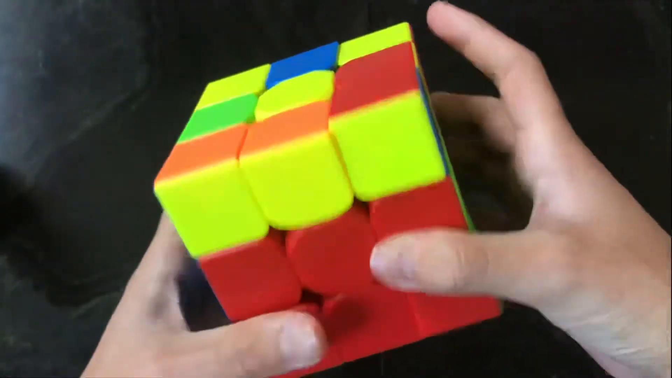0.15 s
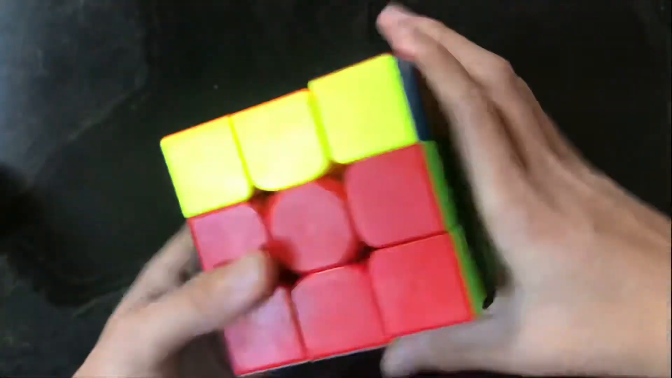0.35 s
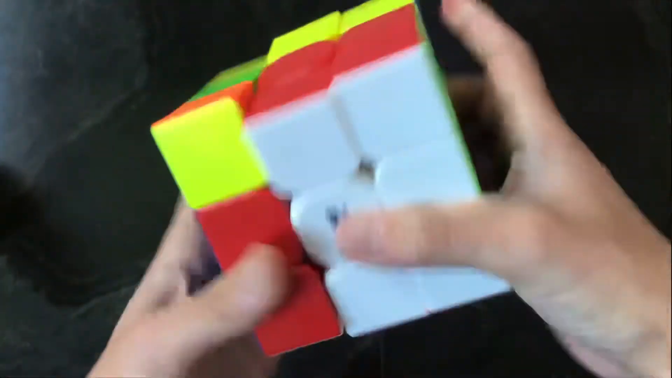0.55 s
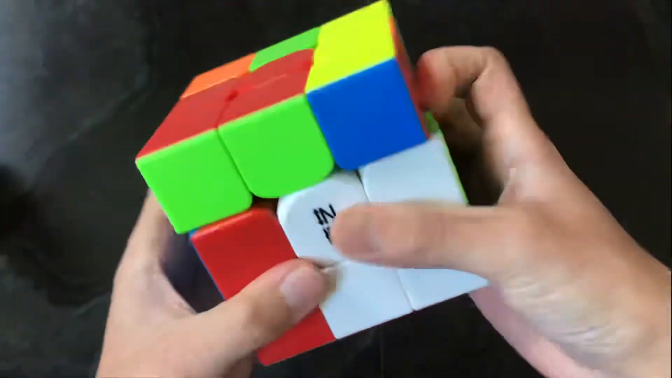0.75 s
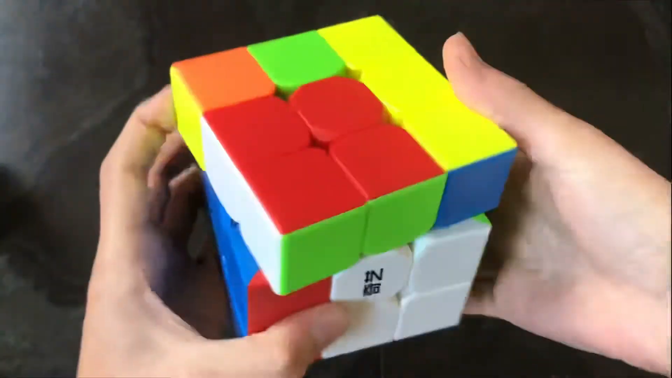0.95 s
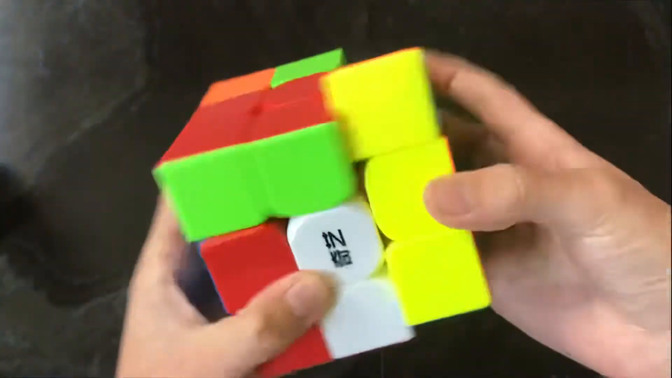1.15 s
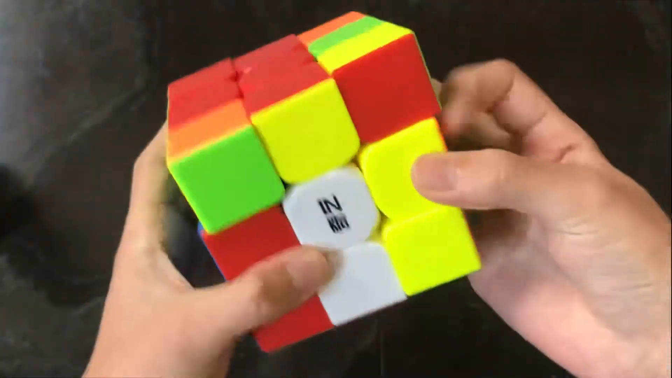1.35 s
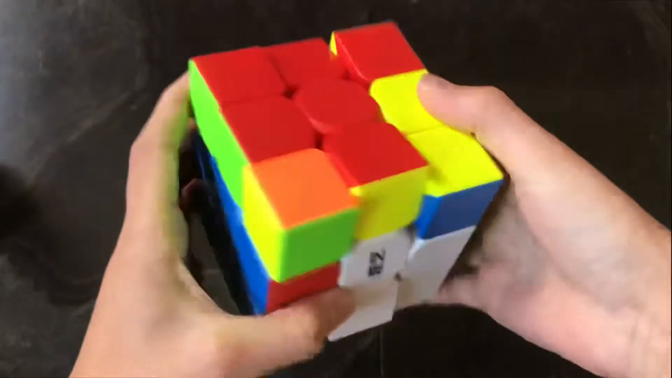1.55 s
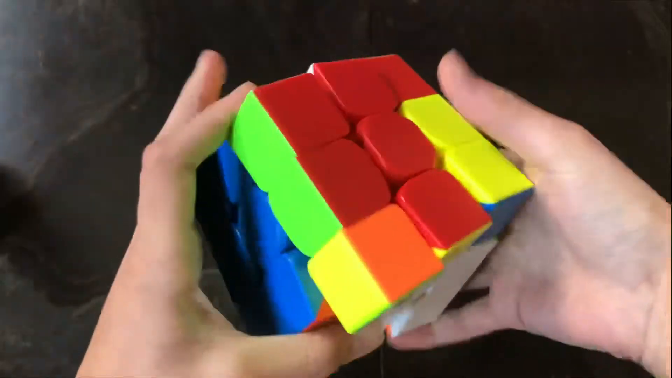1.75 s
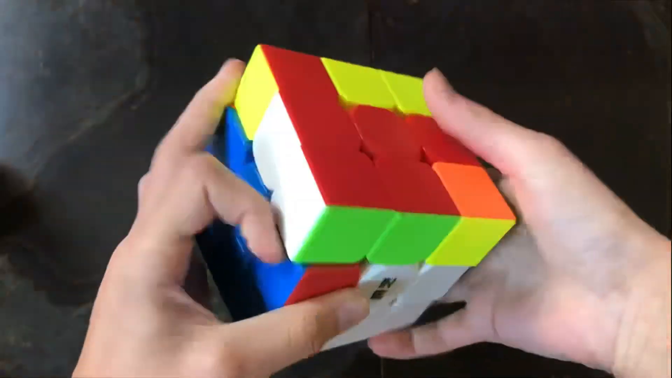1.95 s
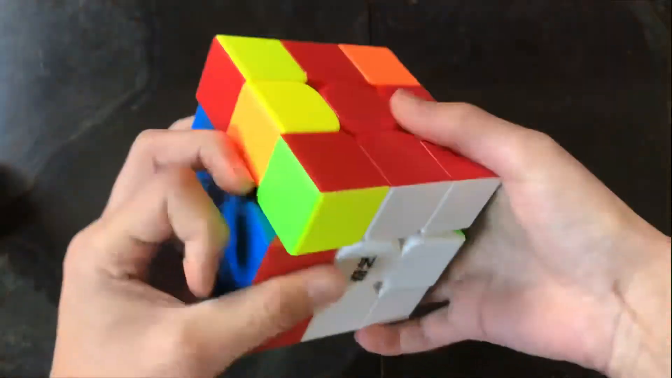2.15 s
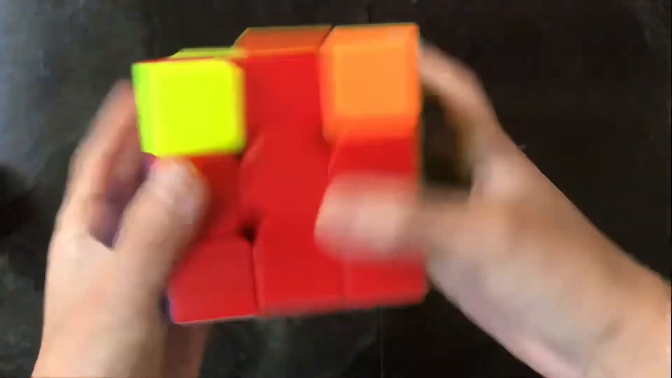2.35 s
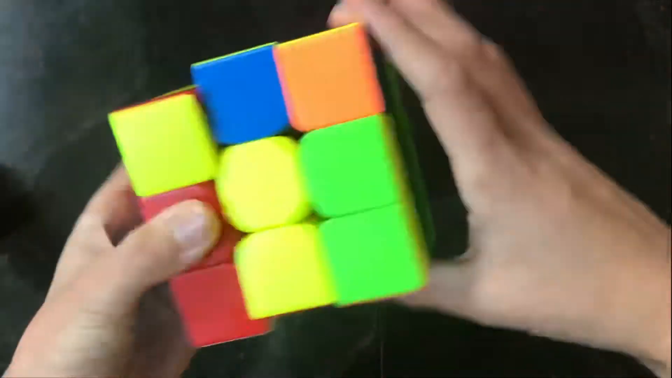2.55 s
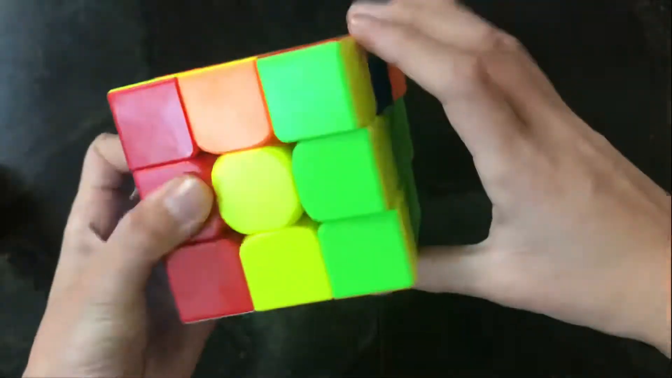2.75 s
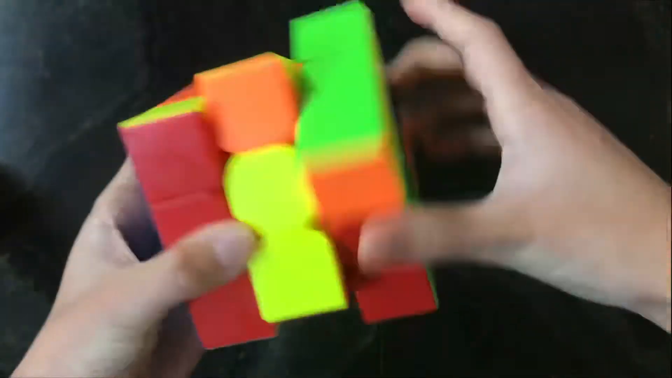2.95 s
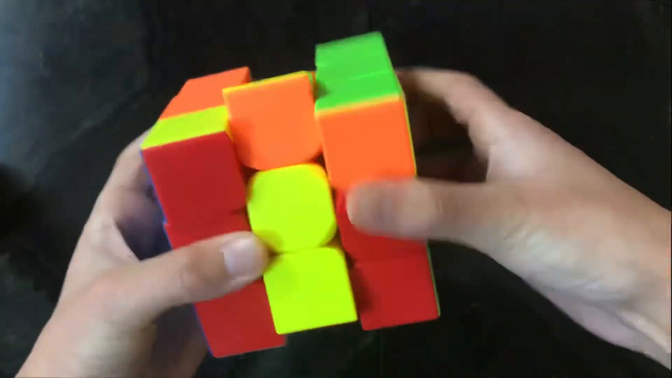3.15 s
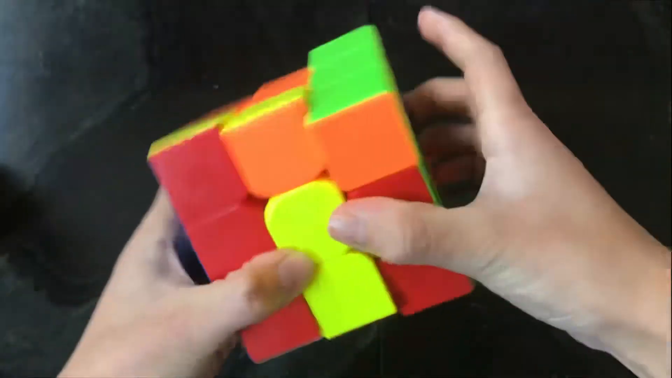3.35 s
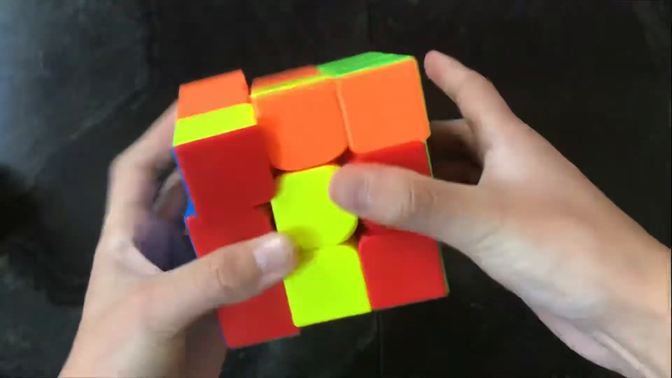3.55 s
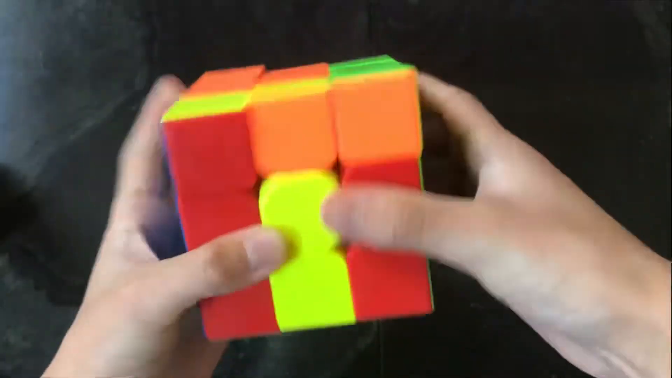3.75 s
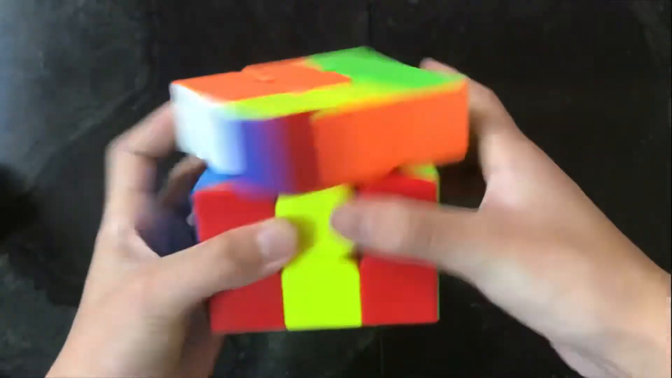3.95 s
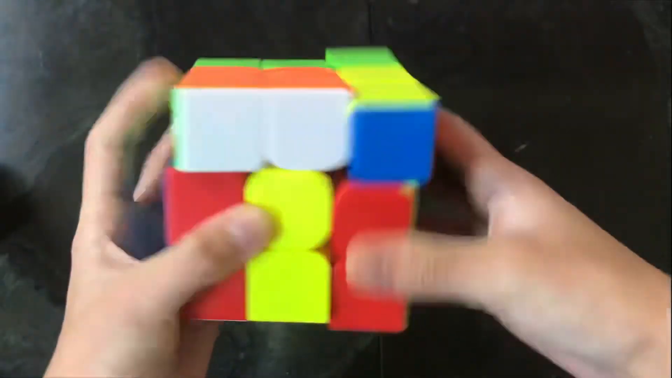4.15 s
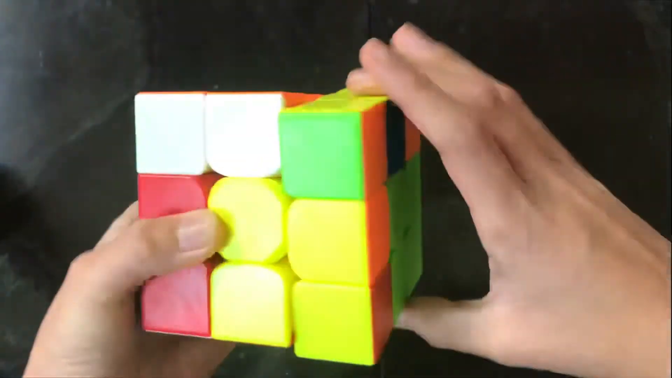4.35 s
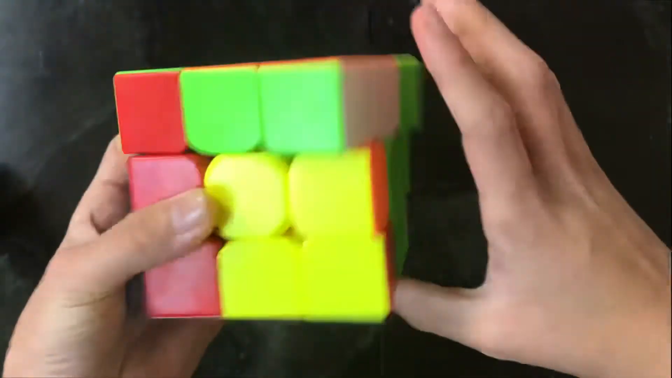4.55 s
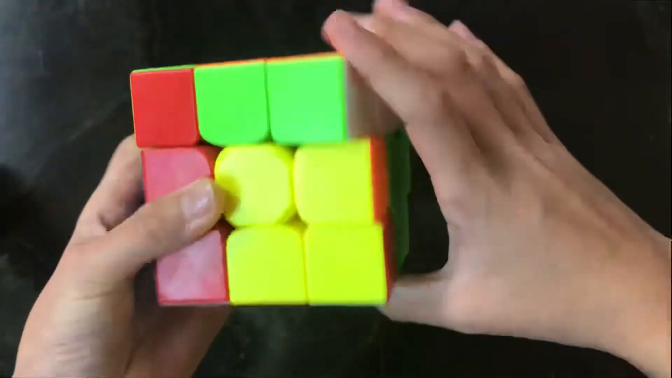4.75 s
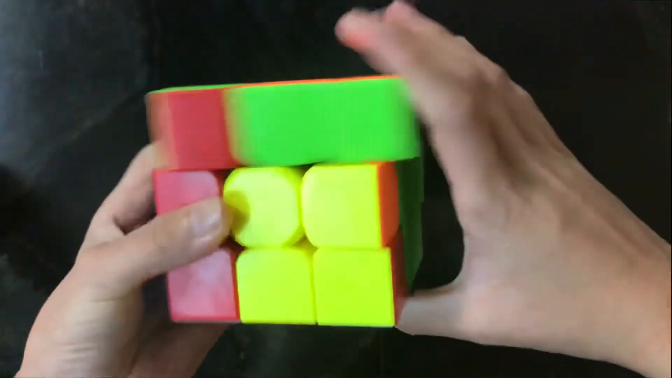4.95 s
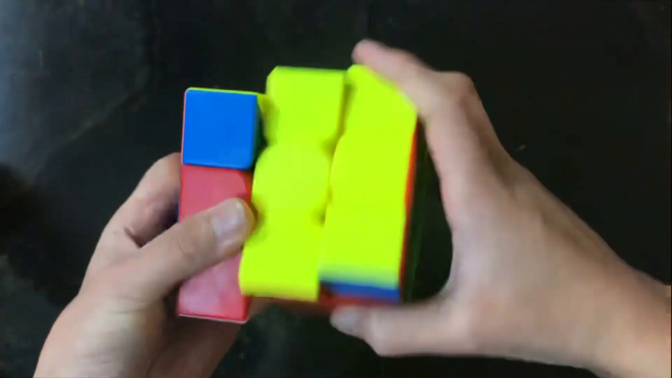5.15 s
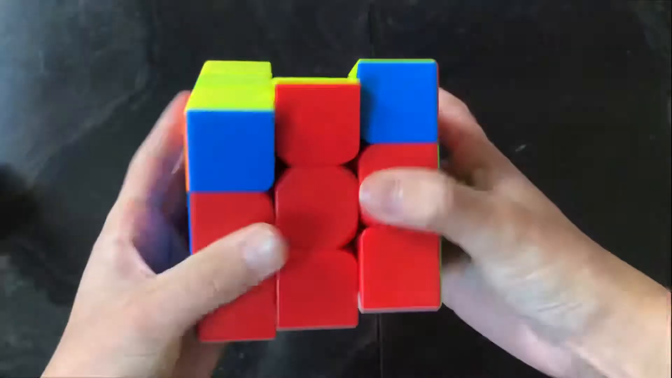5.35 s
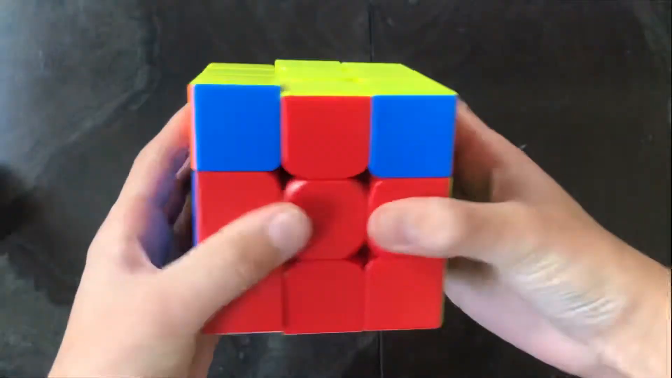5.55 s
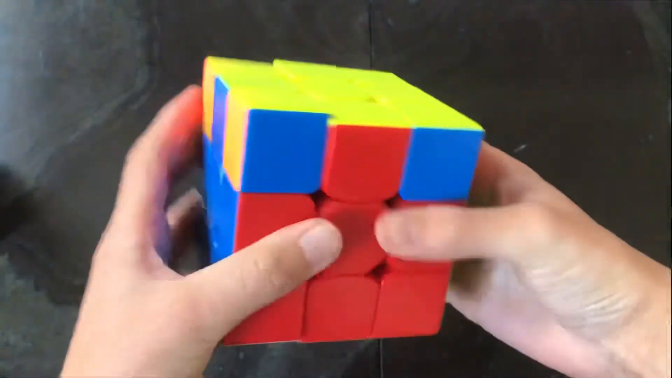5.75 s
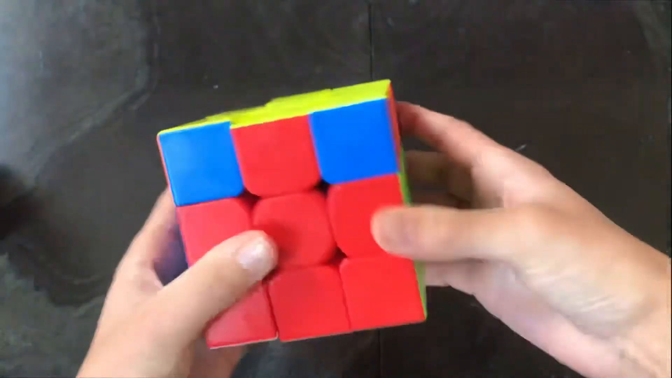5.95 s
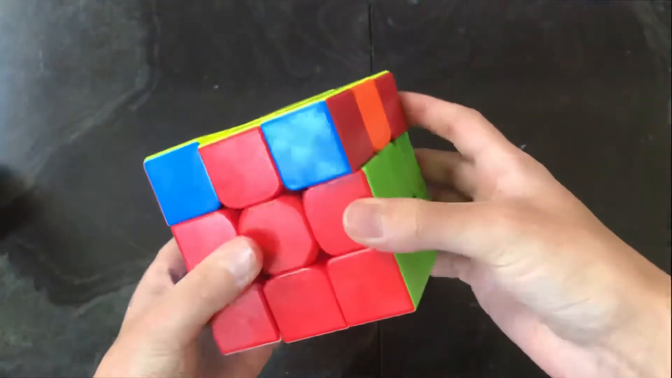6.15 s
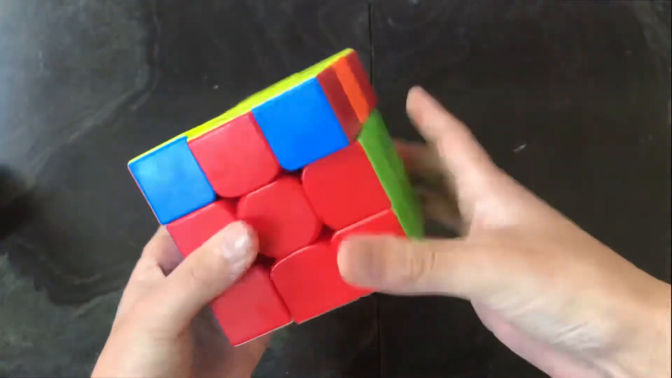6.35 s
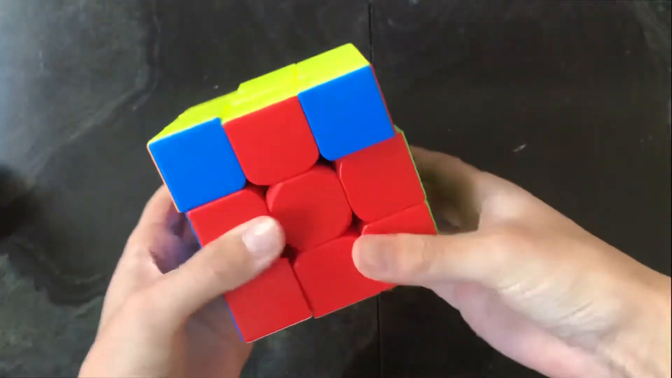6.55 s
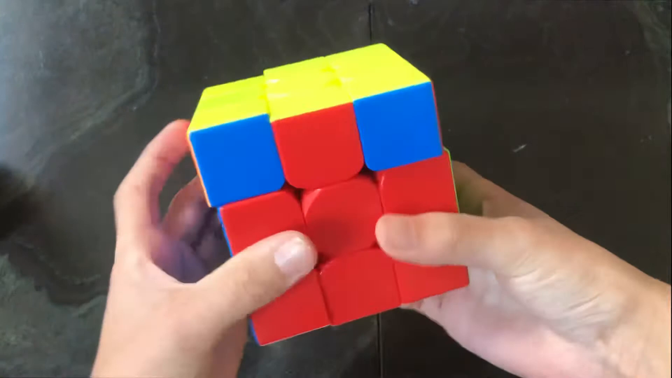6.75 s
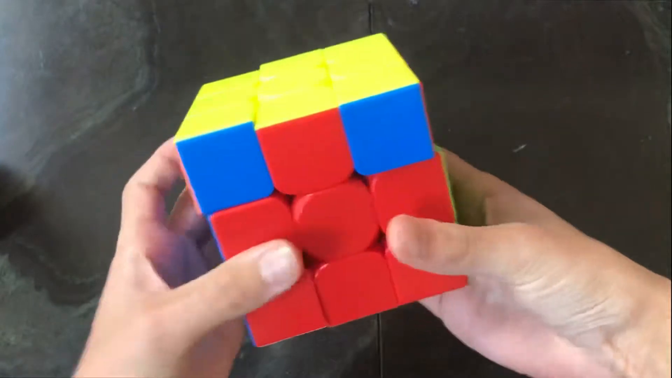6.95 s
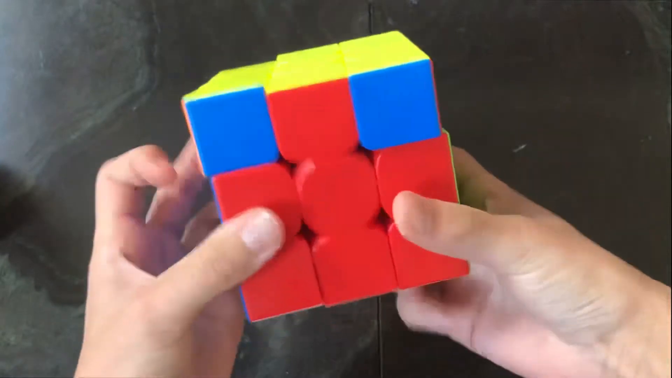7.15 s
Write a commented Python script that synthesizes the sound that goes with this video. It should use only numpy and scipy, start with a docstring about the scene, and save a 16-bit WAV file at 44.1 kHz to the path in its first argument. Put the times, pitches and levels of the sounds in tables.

```python
"""A quiet room: a hollow plastic puzzle cube is twisted fast in two hands, heard from close by.
Clacks are short bursts of tiny contacts; slides are gritty rubbing noise under random ticks.
Both ring the same three groups of cube resonances; the room answers the clacks.
Behind them: a far engine drone of wavering sines, shaped-noise room hush, two soft low bumps."""
import sys
import numpy as np
from scipy import signal
from scipy.fft import rfft, irfft, next_fast_len
from scipy.io import wavfile
from scipy.ndimage import map_coordinates

SR = 44100
rng = np.random.default_rng(int(sys.argv[2]) if len(sys.argv) > 2 else 0)


def dump_mix(stems):
    """Bounce the given channels to the path in sys.argv[1] as a 16-bit WAV at rate SR."""
    frames = np.atleast_2d(stems).T  # one column per channel
    limited = np.clip(frames, -1, 1)  # hard clip at full scale
    pcm = np.round(limited * 32767).astype(np.int16)
    wavfile.write(sys.argv[1], SR, pcm)


N = 317994
TIME_S = np.arange(N) / SR


def amp(db):
    """Decibels to gain."""
    return 10 ** (np.asarray(db) / 20)


def unit(x):
    """Scale to rms 1."""
    return x / np.sqrt(np.mean(x ** 2) + 1e-20)


def curve(rows):
    """Interpolate (t/s, value) rows to one value per sample."""
    return np.interp(TIME_S, *np.transpose(rows))


def along(points, hz):
    """Interpolate (f/Hz, value) points on a log frequency axis."""
    f, value = np.transpose(points)
    return np.interp(np.log(hz + 1), np.log(f + 1), value)


def wobble(rate_hz):
    """Smooth random curve through rate_hz normal-distributed knots a second."""
    knots = rng.standard_normal(int(N * rate_hz / SR) + 4)
    return map_coordinates(knots, [TIME_S * rate_hz])


def filtered(x, response):
    """Multiply the spectrum of x by a response of frequency."""
    m = next_fast_len(N + SR // 2)
    hz = np.fft.rfftfreq(m, 1 / SR)
    return irfft(rfft(x, m) * response(hz), m)[:N]


def gritty(shape, spread_db):
    """Noise whose samples differ widely in size, as many tiny contacts do."""
    size = amp(spread_db * rng.standard_normal(shape))
    return unit(size * rng.standard_normal(shape))


# far engine note before its waver: t/s, level/dB
ENGINE_LEVEL = [(0, -59.5), (.55, -65), (.75, -65.5), (2.4, -73), (2.55, -62.5), (3.5, -60.5), (4.1, -89),
                (4.7, -60.5), (5.7, -64.5), (5.9, -58.5), (7.21, -59)]
# engine pitch before its wobble: t/s, f/Hz
ENGINE_PITCH = [(0, 82.4), (2.6, 79.6), (7.21, 76.3)]
# engine overtones: multiple of the note, median level/dB
ENGINE_OVERTONES = [(2, -74), (3, -82.5), (4, -78.5)]


def drone():
    """Low engine note that swells and fades; faint sine overtones come and go."""
    hz = curve(ENGINE_PITCH) + .4 * wobble(4)
    phase = 2 * np.pi * np.cumsum(hz) / SR
    waver = amp(1.8 * wobble(9))
    out = amp(curve(ENGINE_LEVEL)) * waver * np.sin(phase)
    for multiple, db in ENGINE_OVERTONES:
        out = out + amp(db + 4.7 * wobble(0.81)) * np.sin(multiple * phase)
    return out


# room noise spectrum, relative: f/Hz, level per Hz/dB
HUSH_SPECTRUM = [(18, -49.5), (40, -12), (150, -16), (400, -24), (1000, -28), (1700, -36), (9500, -49.5),
                 (15000, -43.5)]


def hush():
    """Room hush: white noise shaped in frequency, its level drifting a little."""
    white = rng.standard_normal(N)
    noise = unit(filtered(white, lambda hz: amp(along(HUSH_SPECTRUM, hz))))
    drift = amp(.8 * wobble(3))
    return amp(-63.0) * drift * noise


def resonances(f, modes, detune=1, shade=1):
    """Sum of second-order resonances, normalised to keep the power of white noise."""
    centre, width, db = np.transpose(modes)[..., None]
    centre = centre * detune
    sign = (-1.) ** np.arange(len(modes))[:, None]
    peaks = 1j * f * width / (centre * centre - f * f + 1j * f * width)
    h = np.sum(sign * shade * amp(db) * peaks, axis=-2)
    return h / np.sqrt(np.mean(np.abs(h) ** 2, axis=-1, keepdims=True))


def ring(x, modes):
    """Excite one group of resonances with x."""
    return filtered(x, lambda f: resonances(f, modes))


def ticks():
    """Tiny knocks of loose pieces at random times: noise bursts decaying in 0.4 ms."""
    struck = rng.random(N) < 420 / SR  # mean 420 a second
    knocks = struck * amp(14.5 + 4 * rng.standard_normal(N))
    decay = np.exp(-TIME_S[:SR // 200] / .0004)
    return np.convolve(knocks, decay)[:N] * gritty(N, spread_db=3.5)


RISE_DB_PER_S, FALL_DB_PER_S = 693.5, 453  # a turn gets going and comes to rest
SHAKE_DB, SETTLE_DB_PER_S = -17.5, 337.5  # loose pieces after a clack, re its level
LEAD_IN_DB, LEAD_IN_DB_PER_S = -17, 1202.5  # gritty noise swelling up to each clack, re its level
HELD_DB = -72  # median, cube merely held in the fingers
# turns, one layer sliding over the next: start t/s, length/s, level/dB
LAYER_TURNS = [(0.451, 0.12, -46), (0.638, 0.039, -39.5), (0.788, .01, -57), (0.882, 0.05, -54),
               (1.026, 0.062, -47.5), (1.134, 0.14, -43.5), (1.408, 0.044, -52), (1.551, 0.047, -51),
               (1.793, .01, -42.5), (1.894, 0.016, -51.5), (1.998, 0.09, -42), (2.214, 0.099, -50.5),
               (2.312, .1, -46.5), (2.532, 0.13, -53), (2.79, 0.013, -46.5), (2.847, 0.038, -43.5),
               (2.918, 0.027, -44), (3.136, 0.011, -52.5), (3.229, 0.056, -51), (3.45, 0.056, -49.5),
               (3.747, 0.039, -54), (3.906, 0.095, -44.5), (4.116, 0.099, -44.5), (4.387, .145, -46),
               (4.608, 0.16, -60.5), (4.929, .11, -43.5), (5.099, .19, -47.5), (5.385, 0.055, -52.5),
               (5.577, 0.063, -68), (6.553, 0.06, -61), (6.659, .05, -72.5), (7.178, 0.091, -34.5)]


def motion():
    """Level of the gritty noise: powers of grip, turns, lead-ins to clacks and shaking after add."""
    power = amp(2 * (HELD_DB + 4 * wobble(14)))  # fingers shift their grip
    for start, length, db in LAYER_TURNS:
        rise_db = RISE_DB_PER_S * np.maximum(start - TIME_S, 0)
        fall_db = FALL_DB_PER_S * np.maximum(TIME_S - start - length, 0)
        power = power + amp(2 * (db - rise_db - fall_db))
    kicks = np.zeros(N)
    for t, db, *_ in CLACK_EVENTS:
        kicks[round(t * SR)] = amp(2 * db)
    settle = signal.lfilter([1], [1, -amp(-2 * SETTLE_DB_PER_S / SR)], kicks)
    # filtered backwards in time: grows up to each clack
    lead_in = signal.lfilter([1], [1, -amp(-2 * LEAD_IN_DB_PER_S / SR)], kicks[::-1])[::-1]
    return np.sqrt(power + amp(2 * SHAKE_DB) * settle + amp(2 * LEAD_IN_DB) * lead_in)


RUB_DB = -2  # smooth rubbing, median before each group's weight of 2 or 4
# cube resonances in three groups, levels relative within a group: f/Hz, width/Hz, level/dB
HOLLOW_MODES = [(290, 380, -16), (608, 390, -13.5), (1119, 197, 1.5), (2147, 480, -2)]
SHELL_MODES = [(3010, 850, 5.5), (4110, 940, 8.5), (5320, 1500, -3)]
EDGE_MODES = [(6430, 1900, -1), (8860, 470, 0.5), (9550, 390, -3.5), (11800, 760, -3.5), (14600, 4600, -15)]


def slide():
    """Faces rub with a gritty hiss under ticks; some ticks drive one group, some all three."""
    rub = amp(RUB_DB + 5.2 * wobble(60)) * gritty(N, spread_db=3.0)
    shared = ticks()
    hollow = ring(2 * rub + shared + ticks(), HOLLOW_MODES)
    shell = ring(2 * rub + shared + ticks(), SHELL_MODES)
    edges = ring(4 * rub + shared, EDGE_MODES)
    tone = amp(-18.5 + 4 * wobble(40)) * hollow
    tone = tone + amp(-16.5 + 2.7 * wobble(50)) * shell
    tone = tone + amp(-21.5 + 3.2 * wobble(11)) * edges
    return motion() * tone


RING_MS = 1.2  # part of a clack's length that is ringing, not contact
VARY_SHARE, VARY_DB = .05, 2.5  # scatter per clack of each resonance: pitch, level
# pieces clacking into line: t/s, level/dB, hollow knock/dB and bright tick/dB re shell, length/ms
CLACK_EVENTS = [(0.111, -54, -14, 4, 3.8), (0.1655, -49.5, -1.5, -28, 5.5), (0.255, -34, -4.5, -8.5, 1.9),
                (0.448, -38, -8, -1.5, 7.8), (0.4632, -25, -1.5, -11.5, 4.7), (0.4791, -30.5, -3, -12, 4.2),
                (0.4922, -41.5, -2.5, -20.5, 2.3), (0.5609, -54.5, 10.5, -20, 5.1),
                (0.6, -43.5, -4, -34, 2.9), (0.645, -26.5, -5, -12, 2.7), (0.669, -19, -17, -35, 3.2),
                (0.677, -17.5, -5, -36.5, 1.8), (0.698, -40.5, 2, -15, 4), (0.7055, -32, -5.5, -25.5, 2.5),
                (0.7995, -49.5, 0.5, 7.5, 5.2), (0.897, -35, -2.5, -30.5, 1.5),
                (1.0146, -40.5, -0.5, -26.5, 6.8), (1.0342, -42, -2.5, -27, 2.8),
                (1.0468, -30.5, -1, -7, 6.9), (1.083, -17.5, -23.5, -27.5, 0.61),
                (1.0909, -19.5, -4.5, -5.5, 2.47), (1.1674, -34, 1.5, -5.5, 8.6),
                (1.201, -30, -0.5, -6, 2.4), (1.2096, -21.5, -6.5, -9.5, 3.6),
                (1.2439, -30, -4.5, -11, 1.8), (1.29, -36, -8.5, 1.5, 4.7),
                (1.3506, -43.5, 1.5, -2.5, 1.38), (1.4154, -34, -14, -6.5, 2.5),
                (1.4413, -21.5, -0.5, -8.5, 9.1), (1.468, -33, 0.5, -15, 1.4),
                (1.4734, -16, -5.5, -12.5, 3.3), (1.564, -47, -3.5, -13.5, 3),
                (1.586, -41.5, 0.5, -3.5, 3.5), (1.596, -40, -11, -9, 2.3), (1.6698, -51.5, -1, 4, 1),
                (1.7199, -44, -7, -16.5, 1.1), (1.7995, -29.5, -4, -5, 3.7), (1.805, -12, -7.5, 0, 4.6),
                (1.9076, -36.5, -8, -22, 2.7), (1.915, -46.5, -15.5, 12, 6.9),
                (1.9348, -35, -16, 4.5, 2.25), (1.981, -32, -4, -3.5, 3.3), (2.038, -40, -2.5, -7.5, 7.1),
                (2.0717, -28.5, -2, -2.5, 6.2), (2.0911, -28.5, -9.5, -5.5, 3), (2.183, -52.5, -3, -3.5, 3),
                (2.2486, -36, -4.5, -1, 5.3), (2.2643, -28.5, 2, -19.5, 3.5),
                (2.2956, -19.5, -34.5, -13, 2.4), (2.3083, -13, -6.5, -19, 4), (2.35, -31, -12, -9, 2.6),
                (2.3563, -28, -5.5, -22.5, 2.6), (2.3622, -23, -8, -37.5, 1),
                (2.3653, -25.5, -1, -41.5, 4.6), (2.399, -23.5, -8.5, -12.5, 2.1),
                (2.434, -47, 1, -18.5, 2.1), (2.474, -52.5, 10.5, -15, 1.3), (2.5009, -36, -8, -13, 1.4),
                (2.5187, -43.5, 5, -20, 3.5), (2.594, -13, -8, -2.5, 3.5), (2.612, -23, -5, -14.5, 8),
                (2.6271, -30.5, -3, -20, 4.2), (2.6539, -32, -6, -3, 2.4),
                (2.6625, -36.5, -10.5, -3.5, 9.1), (2.681, -40.5, -5.5, -10.5, 3.4),
                (2.7871, -43, -3, -16, 1.9), (2.795, -39, -25, 7.5, 4.6), (2.8388, -45.5, 4.5, -21, 3),
                (2.861, -33.5, -7, -5, 3.9), (2.874, -35.5, 0.5, -12, 5.8), (2.939, -29, -8, -12.5, 5.2),
                (3.0334, -53, -2, -0.5, 4), (3.0544, -46, 1.5, -15.5, 1.7), (3.1971, -49, 8.5, -26, 3.1),
                (3.2324, -50.5, 1, -16, 1.4), (3.2374, -48.5, -9, 3, 4.9), (3.3037, -31, -8.5, -25, 1.9),
                (3.3093, -41, -9.5, -24.5, 3.5), (3.482, -46.5, 6, -52, 0.91), (3.508, -51, 12, -20, 4),
                (3.5617, -18, -9.5, -0.5, 3.6), (3.5738, -20.5, -9, -9.5, 4), (3.581, -33, 2, -13.5, 3),
                (3.5991, -32.5, -5.5, -0.5, 1.5), (3.665, -49.5, -36.5, 0, 5.8),
                (3.7641, -46.5, 8.5, -22.5, 1.1), (3.79, -43.5, -2, -32, 4.1), (3.8036, -39, -5, -28, 4.5),
                (3.8926, -40.5, -14, -8.5, 5.3), (3.918, -38.5, 2.5, -0.5, 2.9), (3.944, -14, -6, -10, 2.4),
                (3.9593, -22, -12, -9, 5.7), (4.02, -35.5, -2, -10.5, 3.6), (4.1248, -41.5, -6, -3.5, 5),
                (4.159, -32, -1.5, -7.5, 6.1), (4.195, -31.5, -2, -6.5, 4.9), (4.208, -15, -5, -5, 3.2),
                (4.419, -51.5, 9.5, -3, 1.7), (4.4775, -50.5, -10.5, -7, 3.5),
                (4.4874, -40.5, 9.5, -21.5, 5), (4.5093, -39, -4, 3.5, 6.1), (4.5234, -36, 0, -2, 4.7),
                (4.607, -51, 6.5, -28, 4.5), (4.7489, -37.5, -5.5, -37, 2.2), (4.8829, -52.5, 4, -32, 4.7),
                (4.9246, -29, 3.5, -3.5, 2), (4.9713, -34, 2, -12, 4.4), (5.0091, -40.5, 2, 5, 7.8),
                (5.024, -34.5, 5, -16.5, 2.1), (5.0328, -31.5, -1, -21.5, 2.4), (5.0887, -37, -4, -5, 6.6),
                (5.1184, -36.5, -3.5, -12, 4.7), (5.1385, -27.5, -2.5, -6, 5.1),
                (5.1985, -36, 1, -4.5, 4.3), (5.2393, -48.5, 7.5, -17, 4), (5.273, -34.5, -11, -5, 1.26),
                (5.408, -36, 1, -10.5, 1.4), (5.5936, -59, 2.5, -12, 1.5), (5.7031, -57, 12, -30.5, 2.9),
                (5.792, -73.5, 10, -17.5, 3.2), (6.0024, -69.5, 13.5, -13, 7.5),
                (6.0887, -42, -2, -11.5, 6.1), (6.24, -70.5, 4, -17, 1.4), (6.257, -68.5, 12, -17, 6),
                (6.2666, -61, -15, -5, 2.7), (6.389, -58, -8, -2, 3), (6.4501, -50, 3, -28, 1.5),
                (6.5523, -52, -9.5, -23, 12.5), (6.75, -64.5, 3, -10, 1.2), (6.821, -66.5, 7, -16, 2.9),
                (6.881, -52, -3.5, -14.5, 1), (6.9235, -59, -1.5, -8, 1.1), (7.066, -69, 3.5, -14.5, 2),
                (7.0957, -56.5, -5.5, -3, 5.6), (7.1405, -43, 0, -17, 6.4), (7.1503, -40.5, 5.5, -26, 4.9),
                (7.1735, -24, -3.5, -8, 9.3), (7.182, -27, 7, -21, 4.2), (7.2071, -19, -8.5, -11, 2.6)]


def clacks():
    """Bursts of tiny contacts build and die; hollows answer 0.6 ms late, edges go quiet first."""
    t = np.arange(2048) / SR
    peak_s, db, knock_db, tick_db, length_ms = np.transpose(CLACK_EVENTS)[..., None]
    contact_s = np.maximum(length_ms - RING_MS, .4) / 1000
    build = (1 - np.exp(-t / (0.58 * contact_s))) ** 2
    die = np.exp(-(t / (0.57 * contact_s)) ** 0.82)
    burst = build * die * gritty((len(CLACK_EVENTS), len(t)), spread_db=6.5)
    energy = np.sum(burst ** 2, axis=1, keepdims=True)
    burst = burst * np.sqrt(.004 * SR / energy)  # level counts over 4 ms
    hollow_drive = amp(knock_db) * np.roll(burst, round(.0006 * SR), axis=1)
    edge_drive = amp(tick_db) * burst * np.exp(-t / (2.4 * contact_s))
    groups = ((hollow_drive, HOLLOW_MODES), (burst, SHELL_MODES), (edge_drive, EDGE_MODES))

    f = np.fft.rfftfreq(2 * len(t), 1 / SR)
    spectrum = 0
    for drive, modes in groups:
        pitch, level = rng.standard_normal((2, len(CLACK_EVENTS), len(modes), 1))
        force = rfft(drive, 2 * len(t))
        rung = force * resonances(f, modes, 1 + VARY_SHARE * pitch, amp(VARY_DB * level))
        force_norm = np.linalg.norm(force, axis=1, keepdims=True)
        rung_norm = np.linalg.norm(rung, axis=1, keepdims=True)
        spectrum = spectrum + rung * force_norm / rung_norm  # ringing keeps the drive's level

    out = np.zeros(N + 2 * len(t))
    starts_s = (peak_s - .3 * contact_s)[:, 0]
    for start, clack in zip(starts_s, amp(db) * irfft(spectrum)):
        out[round(start * SR):][:len(clack)] += clack
    return out[:N]


# room decay: f/Hz, time to fall 60 dB/s
ROOM_DECAY = [(300, 0.22), (4000, 0.2), (12000, 0.07)]


def room(x):
    """Convolve with a noise tail, 200 samples late, each frequency dying at its own speed."""
    hz, t, z = signal.stft(rng.standard_normal(SR // 2), SR, nperseg=256)
    decay = amp(-60 * t / along(ROOM_DECAY, hz)[:, None])
    tail = signal.istft(z * decay, SR, nperseg=256)[1]
    return signal.fftconvolve(np.pad(x, (200, 0)), tail / np.linalg.norm(tail))[:N]


# soft bumps carried through the table: t/s, level/dB, centre f/Hz, length/s, noise against tone
TABLE_BUMPS = [(0.545, -53.5, 230, 0.015, .1), (6.905, -48, 78, 0.056, 1.34)]


def bumps():
    """Soft low thumps: Gaussian swells of a sagging tone, partly smeared into noise."""
    out = np.zeros(N)
    for t, db, hz, length_s, smear in TABLE_BUMPS:
        u = (TIME_S - t) / length_s
        sagging_hz = hz * np.exp(-.2 * np.clip(u, -2, 2))
        tone = np.sin(2 * np.pi * np.cumsum(sagging_hz) / SR)
        swell = np.exp(-u ** 2) * tone * (1 + smear * wobble(2 * hz))
        out += amp(db) * swell * np.sqrt(length_s * SR / np.sum(swell ** 2))
    return out


def scene():
    """Sum the cube, the room's answer to its clacks, and the background."""
    hits = clacks()
    background = drone() + hush() + bumps()
    return (hits + amp(-19.5) * room(hits) + slide() + background)[None]


SHELF_HZ, SHELF_DB, TOP_HZ = 15650, -22, 16677


def record(dry):
    """Treble is much weaker above SHELF_HZ; nothing passes from the band limit TOP_HZ up."""
    def response(hz):
        return (hz < TOP_HZ) * np.where(hz > SHELF_HZ, amp(SHELF_DB), 1)
    return filtered(dry[0], response)[None]


dry = scene()
out = record(dry)
dump_mix(out)
```